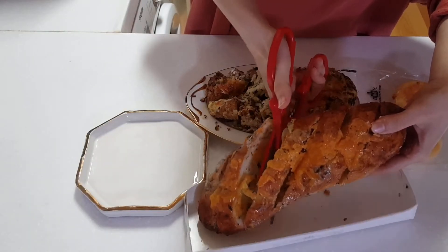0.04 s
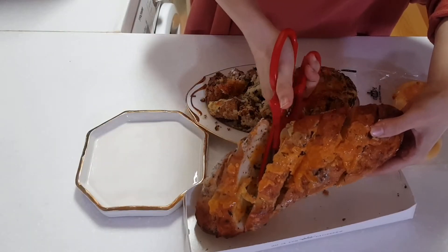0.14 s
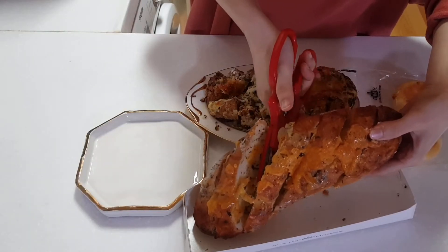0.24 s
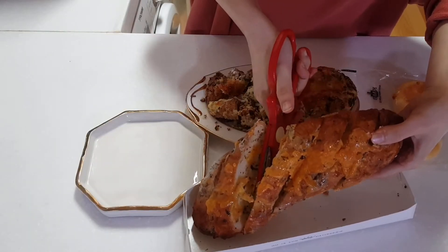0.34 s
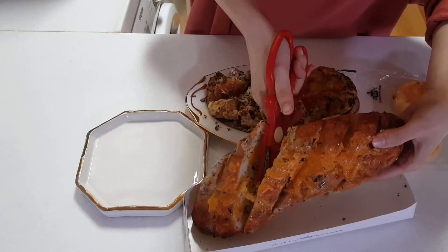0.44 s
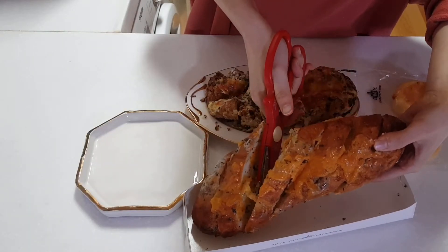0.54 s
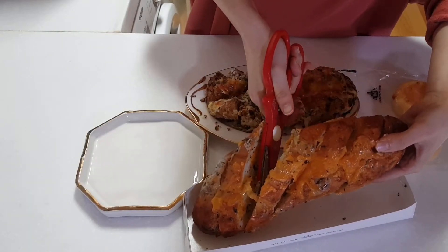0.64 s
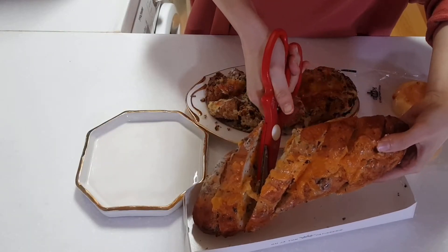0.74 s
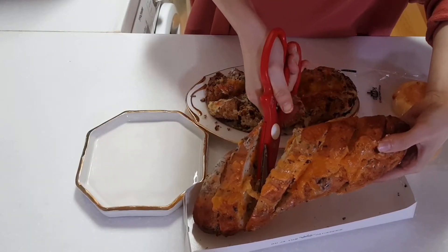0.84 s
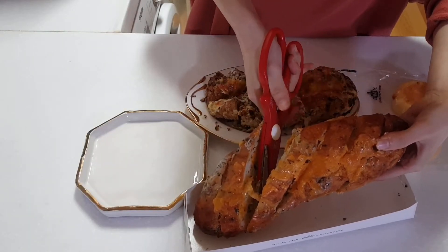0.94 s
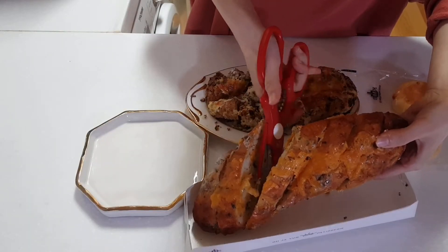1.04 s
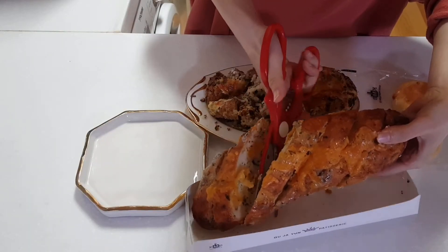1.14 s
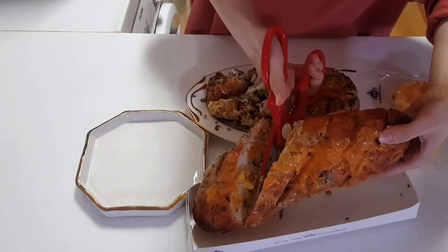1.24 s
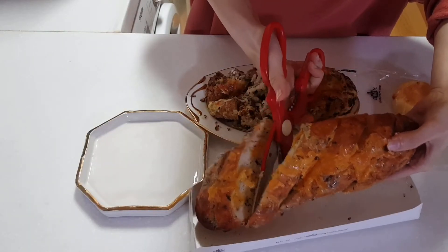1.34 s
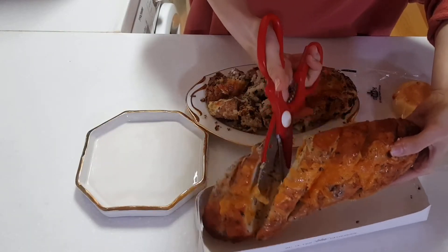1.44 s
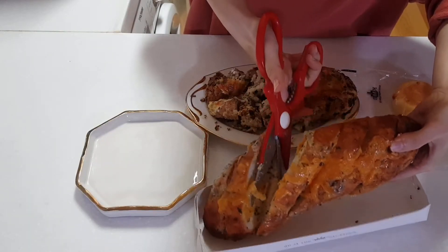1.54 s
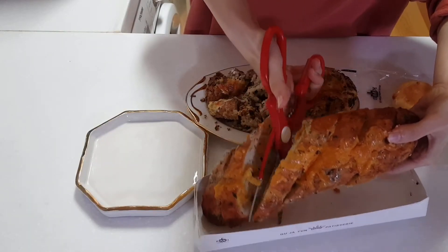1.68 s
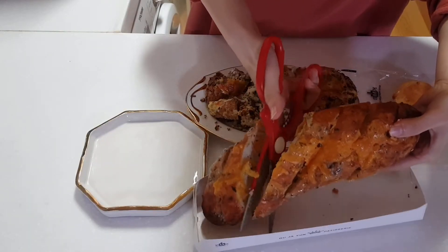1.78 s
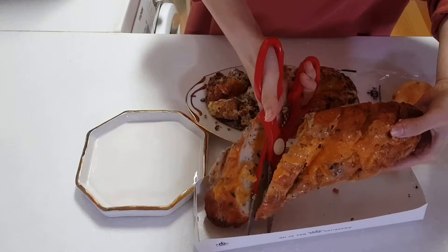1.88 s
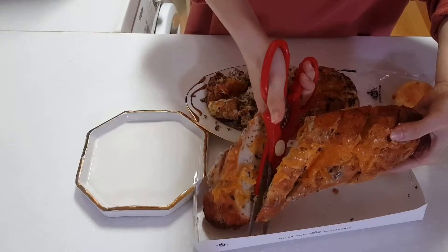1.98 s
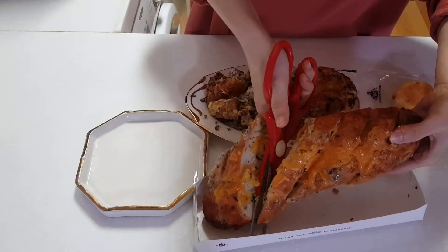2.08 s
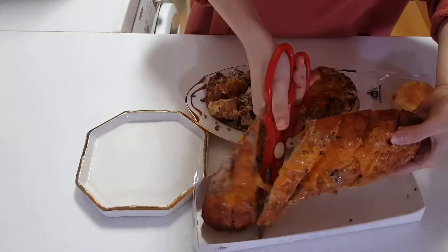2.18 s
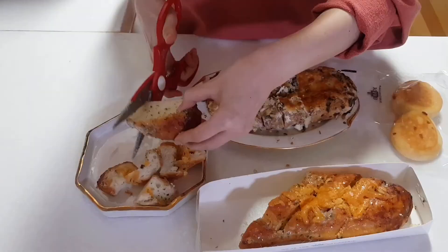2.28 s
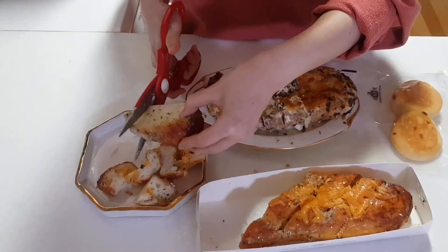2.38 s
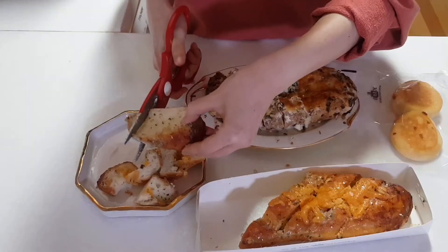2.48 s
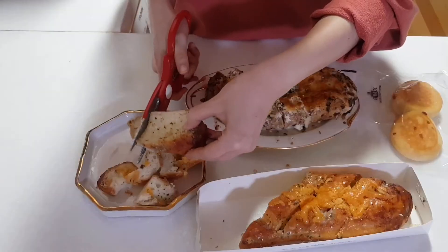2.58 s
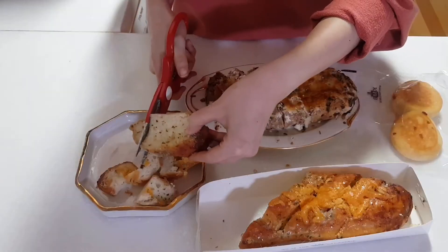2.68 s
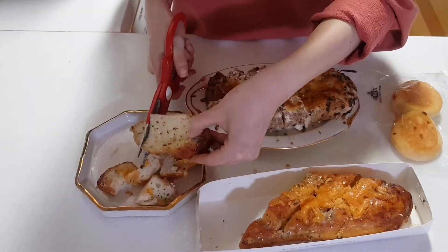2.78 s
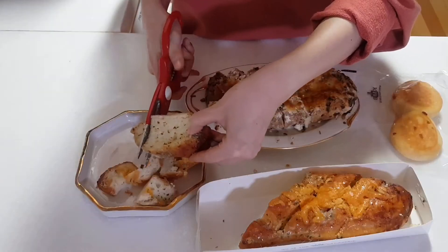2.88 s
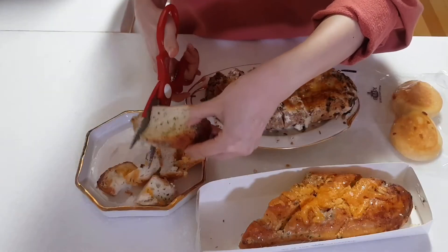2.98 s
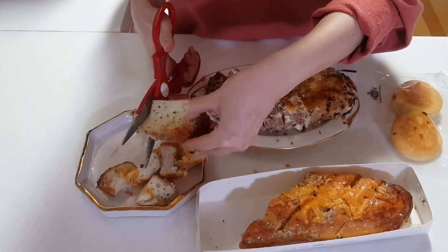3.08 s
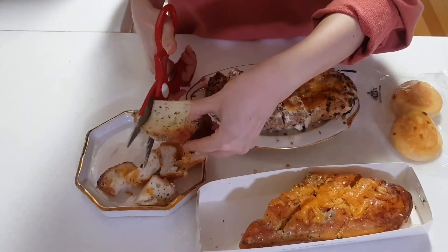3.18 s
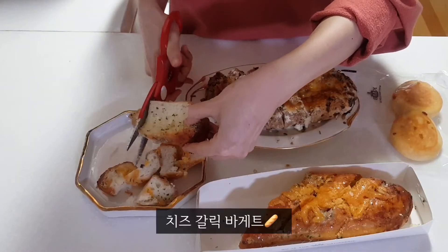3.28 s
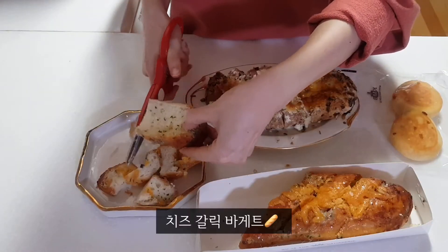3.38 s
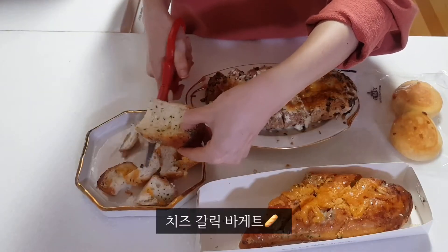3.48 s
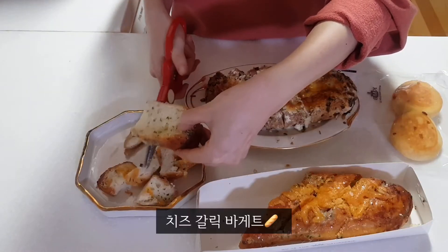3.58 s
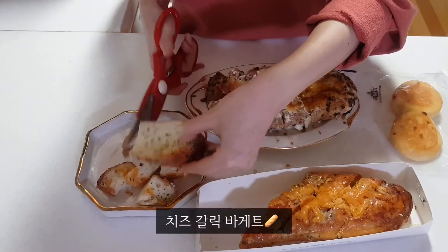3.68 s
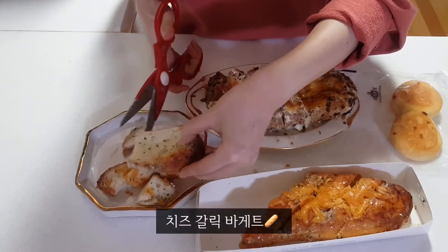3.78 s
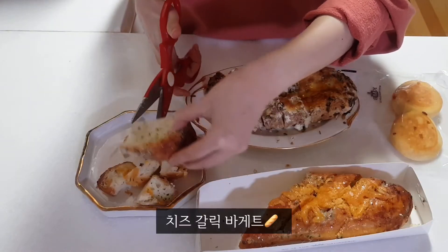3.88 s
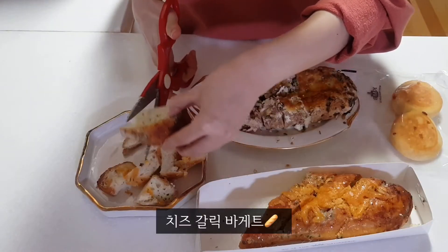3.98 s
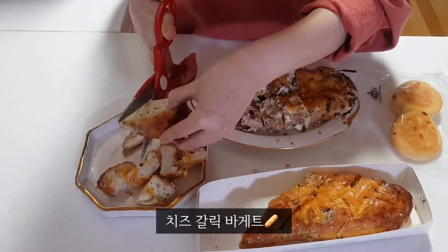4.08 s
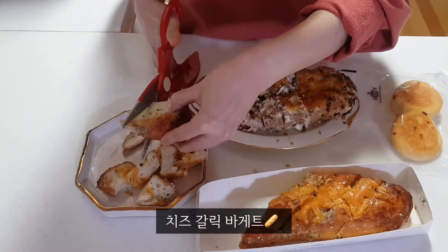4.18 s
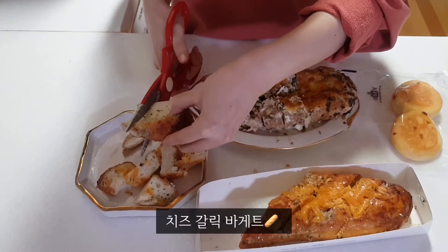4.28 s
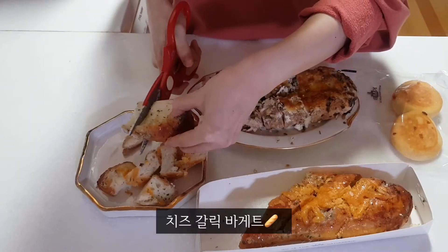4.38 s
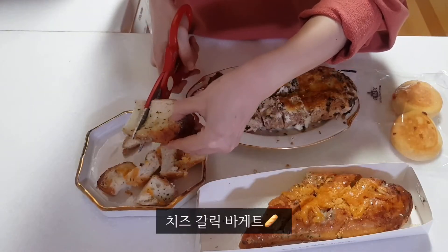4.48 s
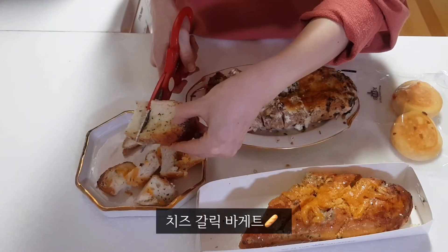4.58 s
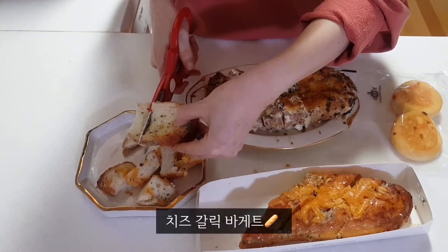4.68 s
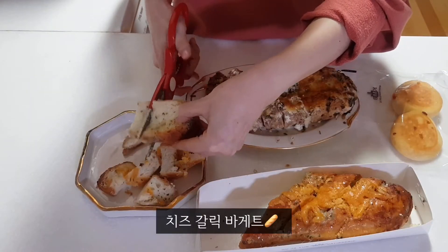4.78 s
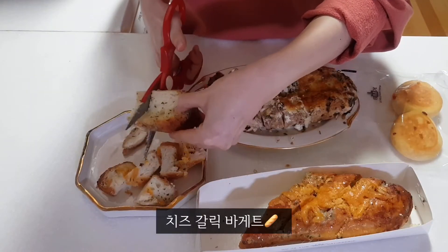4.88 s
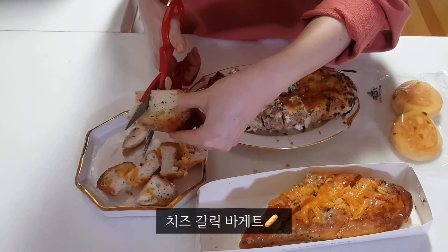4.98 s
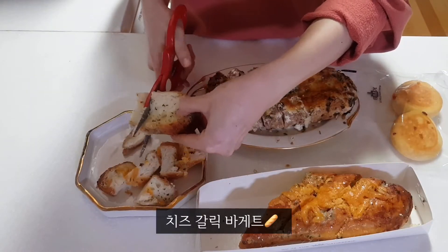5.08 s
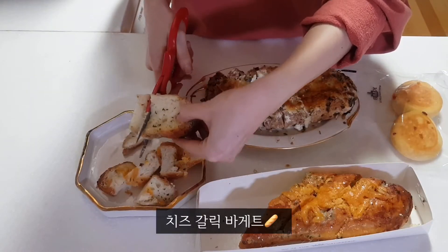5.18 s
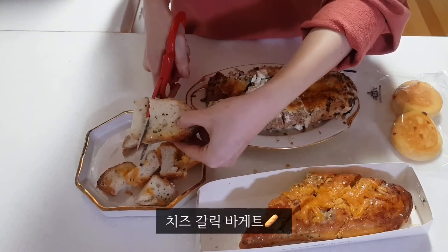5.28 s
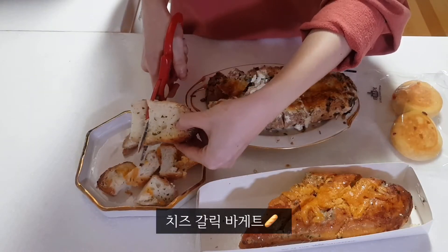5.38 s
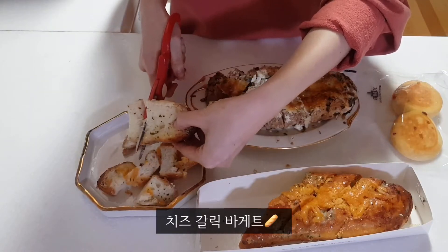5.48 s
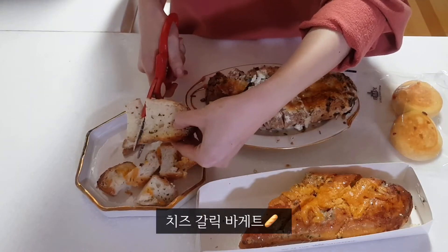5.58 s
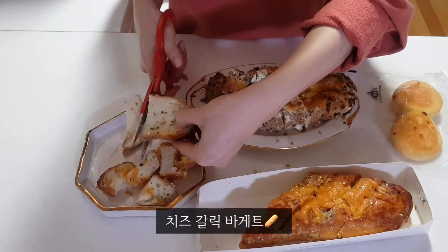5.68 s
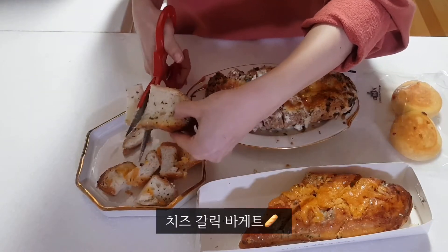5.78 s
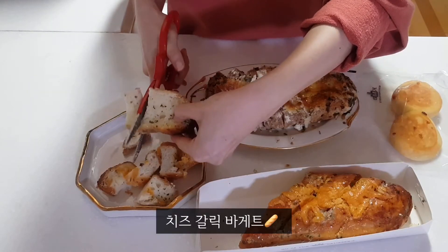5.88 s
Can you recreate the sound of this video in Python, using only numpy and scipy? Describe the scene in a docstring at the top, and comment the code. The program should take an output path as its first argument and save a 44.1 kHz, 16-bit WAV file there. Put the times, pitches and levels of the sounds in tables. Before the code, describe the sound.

A close stereo pickup at a table in a small, quiet room, with faint swelling mains hum and soft rumble and hiss throughout. From 0 to 0.7 s, scissors in a crusty loaf make fine crumbling and scattered sharp ticks. Around 1.1 s come a light tick, soft bread rubbing and small tray knocks, then very faint thin creaks until about 1.75 s. At 1.7-1.9 s the crust crunches and crackles with a knock. A brighter rasp from 2.0 s leads to the loudest event at 2.2 s: blades slam shut with a fast metallic chatter, brief ring and hollow cardboard thump. The tail is cut off at 2.33 s. Quieter plate work follows: a soft rub at 2.8 s, a crisp snip at 3.4 s, rustling and dropping knocks around 3.7 s, dull china bumps at 4.2 s, a small scraping cut at 4.4-4.6 s, and paired sharp ticks near 5.1-5.2 s. Then mostly hum remains to 5.9 s.

```python
"""Kitchen scissors cut a crusty cheese baguette on a cardboard tray, heard close up in a small room.
Fracture grains make the rasp and crumbling, pulses the ticks, decaying modes the ring of blades, tray and plate.
The blades snap shut once; the sound breaks off, then a slice is snipped up over a plate, where pieces drop.
Soft bread rubs and knocks as filtered noise and resonances; sines make a faint hum over soft noise.
Table levels are relative: each source adds its own gain."""
import sys
import numpy as np
from scipy import signal
from scipy.fft import rfft, irfft
from scipy.io import wavfile
from scipy.ndimage import uniform_filter1d

SR = 44100
rng = np.random.default_rng(int(sys.argv[2]) if len(sys.argv) > 2 else 0)


def output_pcm(signal):
    """Save a mono or channel-first signal as 16-bit PCM at the path in sys.argv[1].

    Samples are clipped to [-1, 1] before scaling.
    """
    pcm = np.clip(np.atleast_2d(signal).T, -1, 1) * 32767
    wavfile.write(sys.argv[1], SR, np.round(pcm).astype(np.int16))


N = 261954
TIME = np.arange(N) / SR
BREAK_S = 2.334   # tray part before, plate part after
# rise as a share of stroke length
SLIDE_RISE, CRUNCH_RISE, RUB_RISE, SQUEAK_RISE = 0.18, 0.1, 0.29, 0.72
RELEASE_DB_PER_S = 601

# blades slide through bread and along each other: start_s, length_s, level_db, easing_db
SLIDES = [(.14, 0.4, -70.5, 2), (2.004, 0.02, -57, 4.5), (2.034, 0.078, -49, 12), (2.139, 0.025, -48.5, 3),
          (2.181, 0.0067, -40, -2.5), (2.385, 0.25, -59.5, 6), (2.6, 0.52, -72.5, 13.5),
          (3.393, 0.0087, -50, 0), (3.4, 0.02, -47, 16), (4.27, 0.29, -68.5, -5.5), (4.405, 0.093, -55, 15),
          (4.505, 0.019, -51, 17), (4.598, 0.02, -57.5, 5.5), (5.097, 0.031, -50, 12),
          (5.2, 0.059, -61.5, -3.5)]
# crust crumbles under the blades: start_s, length_s, level_db, easing_db
CRUNCHES = [(.014, 0.21, -69, 9), (.147, 0.13, -61, 5), (1.098, 0.05, -70, -4.5), (1.71, 0.13, -52.5, 18),
            (1.92, 0.042, -58, 10.5), (2.04, 0.053, -49.5, 6), (2.139, 0.017, -50.5, 8),
            (3.402, 0.01, -43, 4.5), (4.415, 0.12, -60, 13), (4.87, 0.049, -72, 5.5)]
# spectrum of the blade rasp: freq_hz, level_db
SLIDE_COLOUR = [(300, -22), (1000, -11.5), (1400, -4.5), (2200, -5.5), (3300, -10.5), (4500, -2), (6300, 0),
                (8500, -3), (12000, 2.5), (16000, -3)]
# spectrum of breaking crust, also used by crackles: freq_hz, level_db
CRUNCH_COLOUR = [(200, -15.5), (700, -5.5), (1150, -11.5), (1700, 0), (2400, 0), (3500, -6.5), (5500, -6.5),
                 (7400, -4.5), (8800, -18), (16000, -20)]


def cutting():
    """Fine bright rasp of the blades and coarser crumbling of the crust, both made of tiny fractures."""
    rasp = grains(SLIDE_COLOUR, per_s=3200, spread_db=3.5, clump_db=10.0, clumps_per_s=220)
    crust = grains(CRUNCH_COLOUR, per_s=600, spread_db=7.5, clump_db=16.0, clumps_per_s=140)
    rasp = effort(SLIDES, SLIDE_RISE) * rasp
    crust = effort(CRUNCHES, CRUNCH_RISE) * crust
    return from_db(3.0) * rasp + from_db(-1.0) * crust


# blades slam shut, with rebounds, then the crust cracks once: start_s, strength_db
SNAP = [(2.1955, 3.5), (2.2012, -8), (2.2025, -4.5), (2.2090, -5.5), (2.2155, -16.5)]
# spectrum of the steel crack: freq_hz, level_db
SNAP_COLOUR = [(250, -27), (900, -16), (1450, -22), (1950, -9.5), (2450, -6.5), (2850, -15), (3400, -12),
               (4100, -3), (5100, -12), (6200, -3), (7500, 4.5), (8600, -15.5), (9600, -3.5), (12000, -5.5),
               (13700, -10), (16000, -18)]
# steel blades pressed shut: freq_hz, level_db, t60_s
BLADE_MODES = [(1945, -6, .14), (2553, -3, .18), (5900, -3.5, 0.19), (6700, -3, .2), (7104, 0, .22),
               (7404, 2, .22), (7504, -2, 0.36), (10386, -3, .17), (10539, -3, .16), (11958, -4, .17)]


def snap(chatter_t60_s=.007, chatter=1.6, uneven_db=1.5):
    """Steel hits steel, then the crust cracks once: each impact is a crack with brief chatter and its own
    colour; the blades ring."""
    out, t = np.zeros(N), TIME[:2048]
    for start_s, strength_db in SNAP:
        noise = rng.standard_normal(len(t))
        force = chatter * unit_energy(noise * from_db(-60 * t / chatter_t60_s))
        force[0] += 1
        colour = [(hz, db + uneven_db * rng.uniform(-1, 1)) for hz, db in SNAP_COLOUR]
        crack = unit_energy(convolve(force, pulse(colour)))
        add(out, start_s, from_db(strength_db + 4.0) * crack)
    return out + from_db(-3.5) * ringing(BLADE_MODES, SNAP)


# blade edges and breaking crust: start_s, peak_db, body_db
TICKS = [(.019,-40,0),(.167,-36.5,-11),(.192,-40,-10),(.2344,-42,-3),(.311,-40,-12.5),(.4895,-33.5,-24.5),(.507,-32,-16.5),(.5633,-31,-21.5),(.7177,-34,-19),(1.1025,-44.5,-4),(1.743,-28.5,-7),(1.8962,-39,-11),(1.9215,-33.5,-14),(2.0395,-31.5,-17),(2.141,-30.5,-14.5),(2.186,-27,-14),(3.343,-45,-9.5),(3.413,-36,-9),(4.518,-40,-11),(5.099,-28.5,-12.5),(5.106,-29,-13.5),(5.213,-36,-12)]
# treble level; treble dB per dB of body: thick crust cracks duller
TICK_TOP_DB, TOP_PER_BODY = -21, -0.56


def ticks(rows):
    """Each tick is one sharp pulse with more or less body."""
    out = np.zeros(N)
    for start_s, peak_db, body_db in rows:
        top_db = TICK_TOP_DB + TOP_PER_BODY * body_db
        colour = [(300, body_db - 13.5), (1000, body_db - 3.0), (2000, body_db + 1.0),
                  (3400, body_db - 6.0), (6000, -14.5), (11000, top_db), (16000, top_db - 2.0)]
        add(out, start_s, from_db(peak_db + 5.5) * unit_energy(pulse(colour)))
    return out


# crust cracks, later stick-slip scrapes of the blades: start_s, peak_db, ring_hz
CRACKLES = [(1.7225, -40, 2630), (1.7505, -40, 2520), (1.7635, -46, 2050), (1.785, -49, 2500),
            (1.801, -45.5, 1400), (4.423, -55, 1390), (4.431, -49, 1780), (4.488, -52, 1400),
            (4.516, -52.5, 1350), (4.553, -57, 1392), (4.604, -55.5, 1730)]


def crackles(ring_cycles=28, crack=0.36, crack_t60_s=0.008):
    """Each crust crack or stick-slip scrape is a tiny noise burst with a brief ring at its own pitch."""
    out, t = np.zeros(N), TIME[:2048]
    for start_s, peak_db, ring_hz in CRACKLES:
        tone = np.sin(2 * np.pi * ring_hz * t) * from_db(-60 * t * ring_hz / ring_cycles)
        burst = rng.standard_normal(len(t)) * from_db(-60 * t / crack_t60_s)
        burst = convolve(burst, unit_energy(pulse(CRUNCH_COLOUR)))
        add(out, start_s, from_db(peak_db) * (tone + crack * burst))
    return out


# scissors creak as they are worked open: start_s, length_s, level_db, first_hz, last_hz
SQUEAKS = [(.22, 0.19, -80.5, 2300, 2290), (1.01, .016, -83, 1900, 1450), (1.29, 0.23, -80.5, 2520, 2470),
           (1.48, .05, -83.5, 720, 930), (1.572, 0.19, -79, 2460, 2570)]


def squeak(width_hz=170, rough_db=3.0, wander=0.005, easing_db=4):
    """Uneven stick and slip in one narrow resonance that glides and wavers with the pressure."""
    slips = rng.standard_normal(N) * from_db(rough_db * drift(70))
    waver, out = 1 + wander * drift(13), 0
    for start_s, length_s, level_db, first_hz, last_hz in SQUEAKS:
        hz = np.interp(TIME, [start_s, start_s + length_s], [first_hz, last_hz]) * waver
        whistle = moving_resonance(slips, hz, width_hz)
        whistle = moving_resonance(whistle, hz, 2 * width_hz)
        out = out + stroke(start_s, length_s, level_db, easing_db, SQUEAK_RISE) * whistle
    return from_db(5.5) * out


# open blades touch: start_s, strength_db
BLADE_TOUCHES = [(5.018, -21)]
# steel blades standing open: freq_hz, level_db, t60_s
OPEN_BLADE_MODES = [(1400, -7, .05), (2000, -5, 0.033), (5270, -12, .08), (7569, -1.5, 0.061),
                    (10900, -6, .07)]


def open_blades(touches):
    """The open blades touch and their modes ring faintly."""
    return ringing(OPEN_BLADE_MODES, touches)


# bread shifts on tray and plate: start_s, length_s, level_db, easing_db, hollow_hz
RUBS = [(0, 0.077, -64, 3, 550), (0.091, 0.11, -61, 25, 690), (1.066, 0.16, -63, 16, 457),
        (1.714, 0.16, -53, 18.5, 744), (2.368, 0.2, -61.5, 11.5, 1350), (2.526, 0.23, -66.5, 4.5, 631),
        (2.767, 0.1, -52.5, 13, 600), (2.997, 0.11, -70, -0.5, 582), (3.374, 0.3, -59.5, 6, 534),
        (3.667, 0.052, -56, 0, 518), (3.695, 0.14, -42, 21.5, 515), (3.7, 0.22, -47.5, 23, 1060),
        (4.025, 0.12, -64, 2, 558), (4.201, 0.1, -59, 5.5, 383), (5.146, 0.11, -60, 5.5, 497)]
# spectrum of the dull rustle: freq_hz, level_db
RUB_COLOUR = [(60, -14.5), (170, -9.5), (330, -9), (500, 0), (650, -12.5), (870, -2), (1400, -12),
              (1900, -18.5), (3500, -22), (7500, -23), (8800, -29), (16000, -37.5)]
# a firm rub rustles more, a light one is mostly hollow tone
FIRM_RUB_DB, RUSTLE_GROWTH = -46.5, 0.14


def rubbing(width_hz=200, width_at_hz=550, width_growth=1.9, wander=0.041, rough_db=2.0):
    """Soft bread slips in small steps: dull rustle and wandering hollow resonance, broader when higher."""
    rustle = grains(RUB_COLOUR, per_s=3000, spread_db=3.5, clump_db=2.5, clumps_per_s=70)
    slips = rng.standard_normal(N) * from_db(rough_db * drift(150))
    waver, hollow = 1 + wander * drift(22), 0
    for *shape, hollow_hz in RUBS:
        centre_hz = hollow_hz * waver
        band_hz = width_hz * (hollow_hz / width_at_hz) ** width_growth
        tone = moving_resonance(slips, centre_hz, band_hz)
        tone = moving_resonance(tone, centre_hz, band_hz)
        hollow = hollow + stroke(*shape, RUB_RISE) * tone
    band = signal.butter(4, [280, 1950], "band", fs=SR, output="sos")
    hollow = signal.sosfilt(band, hollow)
    force = effort(RUBS, RUB_RISE)
    rustle = force * (force / from_db(FIRM_RUB_DB)) ** RUSTLE_GROWTH * rustle
    return from_db(-4.0) * rustle + from_db(-3.5) * hollow


# bread and scissors on tray and plate: start_s, level_db, ring_hz, bass_db, hardness_db
KNOCKS = [(1.076,-51.5,378,6.5,-10),(1.101,-54.5,573,14,12),(1.137,-41.5,291,1,7.5),(1.198,-54,487,-3,3),(1.713,-41,550,-2,-3),(1.722,-32.5,2000,-2.5,7.5),(1.926,-46,390,-7.5,-12),(2.2138,-29.5,316,5,-19),(2.236,-33,580,-5,-6),(2.776,-56,552,8,-15.5),(2.789,-54.5,595,7,-17),(3.4686,-37,1176,3.5,-1.5),(3.471,-55,138,22,-16),(3.671,-50,521,7,-8),(3.711,-36,497,-3,-22),(3.724,-32.5,1182,-6,-5.5),(3.748,-31.5,880,-11,-11),(4.193,-49.5,376,14,1),(4.24,-49.5,360,13,-7),(5.16,-57.5,133.5,11,2)]
RING_PER_BASS = 0.46   # dB of ring per dB of bass: a heavy knock rings more
RATTLE_PER_HARDNESS = -0.25   # dB of rattle length per dB of hardness: a soft piece lands slowly


def knocks(rows, rattle_t60_s=0.046, rattle=1.0, ring_cycles=30, ring=0.65, contact_s=0.00039):
    """A push with a short rattle of crumbs, and one damped tray or plate resonance; harder is brighter."""
    out, t = np.zeros(N), TIME[:4096]
    for start_s, level_db, ring_hz, bass_db, hard_db in rows:
        t60_s = rattle_t60_s * from_db(RATTLE_PER_HARDNESS * hard_db)
        crumbs = unit_energy(rng.standard_normal(len(t)) * from_db(-60 * t / t60_s))
        push = t * np.exp(-t / contact_s)   # a soft contact swells instead of clicking
        force = rattle * crumbs + 0.16 * unit_energy(np.gradient(push))
        colour = [(50, bass_db - 15.5), (130, bass_db - 10), (220, bass_db - 2.0),
                  (340, bass_db + 3), (950, 0.77), (2700, hard_db - 7.0), (3900, hard_db - 16.0),
                  (7400, hard_db - 28.5), (9500, hard_db - 30.0)]
        thud = unit_energy(convolve(force, pulse(colour)))
        decay = from_db(-60 * t * ring_hz / ring_cycles)
        tone = unit_energy(np.sin(2 * np.pi * ring_hz * t) * decay)
        tone = ring * from_db(RING_PER_BASS * bass_db) * tone
        add(out, start_s, from_db(level_db + 17.0) * (thud + tone))
    return out


# bumps hard enough to ring the plate: start_s, strength_db
PLATE_TOUCHES = [(4.193, -24.5), (4.241, -20)]
# china plate damped by the bread: freq_hz, level_db, t60_s
PLATE_MODES = [(1078, 0.5, .08), (1480, -2, 0.07), (2095, -9, 0.06), (2740, -1.5, 0.03)]


def plate():
    """Bumps ring the modes of the damped china plate."""
    return ringing(PLATE_MODES, PLATE_TOUCHES)


# the snap jolts the loaf against the tray: start_s, strength_db
TRAY_BUMPS = [(2.214, 0)]
# hollow cardboard tray on the table: freq_hz, level_db, t60_s
TRAY_MODES = [(318.4, -0.5, .06), (554.7, -1, 0.13)]


def tray():
    """The jolt rings the modes of the hollow cardboard tray."""
    return ringing(TRAY_MODES, TRAY_BUMPS)


# reverberation: freq_hz, t60_s
ROOM_T60 = [(150, 0.43), (400, 0.26), (1000, 0.28), (2800, 0.29), (7300, 0.33), (15000, 0.25)]
# left-right correlation of the room: freq_hz, likeness
ROOM_LIKENESS = [(100, 0.54), (300, 0.74), (700, 0.31), (2000, 0.062), (8000, 0.045)]


def room(dry, late_db=-5.0, early_db=-6, early_t60_s=0.043, gap_s=0.0046):
    """Quick table-top reflections and a short diffuse tail, as decaying noise responses in stereo."""
    size = 24000
    t, hz = TIME[:size], np.fft.rfftfreq(size, 1 / SR)
    noise = stereo_noise(ROOM_LIKENESS, size)
    edges_hz = [0, *(125 * 2 ** np.arange(8)), SR]
    late = 0
    for low, high in zip(edges_hz, edges_hz[1:]):
        band = irfft(noise * ((hz >= low) & (hz < high)))
        late = late + band * from_db(-60 * t / at_hz(ROOM_T60, low * np.sqrt(2)))
    late = unit_energy(late * (1 - np.exp(-t / gap_s)))
    early = irfft(stereo_noise(ROOM_LIKENESS, size)) * from_db(-60 * t / early_t60_s)
    early = unit_energy(early * (t > .0007))
    response = np.sqrt(2) * (from_db(late_db) * late + from_db(early_db) * early)
    return np.array([convolve(dry, side) for side in response])


def heard(dry, pan_db, lag_count):
    """Direct sound and room; the right channel is pan_db quieter and lag_count samples later."""
    left, right = from_db(-3.0) * dry + room(dry)
    return from_db(4.0) * np.array([left, from_db(-pan_db) * np.roll(right, lag_count)])


# mains hum partials: multiple, level_db
HUM = [(1, -1.5), (3, -17.5), (5, -14), (6, -20), (7, -14), (8, -17), (9, -18.5)]
# swell of the fundamental: time_s, level_db
HUM_SWELL = [(0, -74.5), (.4, -71.5), (1.15, -65), (1.55, -70), (2.3, -70.5), (3.05, -62), (3.75, -68.5),
             (4.5, -70.5), (4.9, -76.5), (5.94, -69.5)]
HUM_HZ, HUM_DB = 59.46, -69   # HUM_DB: base level of the overtones


def hum():
    """Mains sines: a swelling fundamental and unsteady overtones, stronger on the left."""
    out = 0
    for multiple, level_db in HUM:
        level = gain_curve(HUM_SWELL) if multiple == 1 else from_db(HUM_DB + 2.0 * drift(3.5))
        tone = np.sin(2 * np.pi * (multiple * HUM_HZ * TIME + rng.random()))
        out = out + from_db(level_db) * level * np.sqrt(2) * tone
    return out * from_db([[3.4], [-5.7]])


# noise spectrum: freq_hz, level_db
FLOOR_COLOUR = [(20, -3), (45, -0.5), (100, 1), (210, -11), (400, -6.5), (560, -8), (700, -12),
                (2000, -17.5), (4500, -24.5), (7500, -23), (9000, -28.5), (12000, -19.5), (16000, -20)]
# left-right correlation: freq_hz, likeness
FLOOR_LIKENESS = [(60, 0.87), (400, 0.59), (1500, 0.096), (5000, 0.21)]
# left minus right: freq_hz, balance_db
FLOOR_BALANCE = [(60, 4), (500, 8.5), (1500, 2.5), (5000, 5), (14000, 2)]
FLOOR_DB = -73


def room_air():
    """Soft room rumble and hiss: stereo noise shaped in frequency."""
    hz = np.fft.rfftfreq(N, 1 / SR)
    balance = from_db(at_hz(FLOOR_BALANCE, hz) * np.array([[.5], [-.5]]))
    balance = balance / balance.mean(0)
    spectrum = stereo_noise(FLOOR_LIKENESS, N) * from_db(at_hz(FLOOR_COLOUR, hz))
    air = irfft(spectrum * balance, N)
    return from_db(FLOOR_DB) * air / np.std(air.mean(0))


def from_db(db):
    """Decibels to gain."""
    return 10 ** (np.asarray(db) / 20)


def rms_one(x):
    """Scale to rms 1."""
    return x / np.sqrt(np.mean(x ** 2) + 1e-20)


def unit_energy(x):
    """Scale to total energy 1."""
    return x / np.sqrt(np.sum(x ** 2) + 1e-20)


def gain_curve(rows):
    """Rows of time_s, level_db as a gain for every sample."""
    return from_db(np.interp(TIME, *np.transpose(rows)))


def at_hz(points, hz):
    """Read a table on a log-frequency axis."""
    table = np.array(points)
    return np.interp(np.log(np.maximum(hz, 1)), np.log(table[:, 0]), table[:, 1])


def drift(rate_hz):
    """Random wander: straight lines between normal draws, rate_hz draws a second."""
    steps = rng.standard_normal(8000)
    return np.interp(TIME * rate_hz, np.arange(len(steps)), steps)


def pulse(colour, size=2048):
    """Minimum-phase pulse of the given spectrum, by folding the cepstrum."""
    cepstrum = irfft(np.log(from_db(at_hz(colour, np.fft.rfftfreq(size, 1 / SR)))))
    cepstrum[1:size // 2] *= 2
    cepstrum[size // 2 + 1:] = 0
    return irfft(np.exp(rfft(cepstrum)))


def convolve(x, response):
    """Pass a signal through a response, keeping its length."""
    return signal.oaconvolve(x, response)[:len(x)]


def add(track, start_s, sound):
    """Mix a sound into a track at start_s."""
    start = max(int(round(start_s * SR)), 0)
    track[start:start + len(sound)] += sound[:N - start]


def stereo_noise(likeness, size):
    """Spectra of two white noises, correlated by the given table."""
    alike = np.clip(at_hz(likeness, np.fft.rfftfreq(size, 1 / SR)), -.99, .99)
    mid, side = np.exp(2j * np.pi * rng.random((2, size // 2 + 1)))
    return np.sqrt(1 + alike) * mid + np.sqrt(1 - alike) * side * [[1], [-1]]


def grains(colour, per_s, spread_db, clump_db, clumps_per_s):
    """Tiny fractures of uneven size that come in clumps; rms 1."""
    born = rng.random(N) < per_s / SR
    sizes = from_db(spread_db * np.minimum(rng.exponential(1, N), 4)) * rng.choice([-1, 1], N)
    clicks = born * sizes * from_db(clump_db * drift(clumps_per_s))
    # the steady push of the hand keeps the average work even
    power = np.abs(uniform_filter1d(clicks ** 2, size=700))
    clicks = clicks / np.sqrt(power + 1e-6)
    return rms_one(convolve(clicks, pulse(colour)))


def moving_resonance(x, hz, width_hz):
    """One damped resonance whose centre follows hz; rms 1."""
    turn = np.exp(2j * np.pi * np.cumsum(hz) / SR)
    damped = signal.lfilter([1], [1, -np.exp(-np.pi * width_hz / SR)], x / turn)
    return rms_one((turn * damped).real)


def stroke(start_s, length_s, level_db, easing_db, rise):
    """Gain of one hand stroke: builds up, eases off by easing_db over its length, then lets go."""
    t = np.maximum(TIME - start_s, 0)
    length_s = max(length_s, .002)
    rise_s = np.clip(rise, .01, .9) * length_s
    eased = np.clip((t - rise_s) / (length_s - rise_s), 0, 1)
    released_s = np.clip(t - length_s, 0, 1)
    gain = from_db(level_db - easing_db * eased - RELEASE_DB_PER_S * released_s)
    return np.minimum(t / rise_s, 1) * gain


def effort(rows, rise):
    """Gain of a whole table of strokes; where they overlap their powers add."""
    return np.sqrt(sum(stroke(*row[:4], rise) ** 2 for row in rows))


def ringing(body, blows):
    """Every blow sets the modes of a body ringing, each mode with a random strength."""
    out, t = np.zeros(N), TIME[:SR // 2]
    hz, level_db, t60_s = np.transpose(body)[:, :, None]
    modes = from_db(level_db - 60 * t / t60_s) * np.sin(2 * np.pi * hz * t)
    for start_s, strength_db in blows:
        uneven = from_db(rng.normal(0, 2, len(hz)))
        add(out, start_s, from_db(strength_db - 38) * (uneven @ modes))
    return out


# right-channel treble of the snap: freq_hz, level_db
RIGHT_SNAP_COLOUR = [(4300, 0.5), (6300, -3), (7800, -10.5), (8650, 8.5), (9700, 1.5), (13000, 0)]


def scene():
    """Cutting on the tray stops dead in the tail of the snap; the slice over the plate follows."""
    blades = cutting() + squeak() + crackles()
    bread = rubbing() + plate() + tray()
    first = np.clip((BREAK_S - TIME) / .004 + .5, 0, 1)   # 4 ms crossfade
    left, right = heard(snap(), pan_db=7.5, lag_count=1)
    right = convolve(right, pulse(RIGHT_SNAP_COLOUR))
    out = room_air() + hum() + first * np.array([left, right])
    for on_tray, part in ((True, first), (False, 1 - first)):
        tick_rows, knock_rows, touch_rows = (
            [row for row in table if (row[0] < BREAK_S) == on_tray]
            for table in (TICKS, KNOCKS, BLADE_TOUCHES))
        scissors = part * blades + ticks(tick_rows) + open_blades(touch_rows)
        scissors = heard(scissors, pan_db=12.5, lag_count=1 if on_tray else 6)
        table_top = part * bread + knocks(knock_rows)
        table_top = heard(table_top, pan_db=7.5 if on_tray else 9.0, lag_count=1)
        out = out + part * (scissors + table_top)
    return out


CUTOFF_HZ = 15900


def record(dry):
    """Clip at full scale, then cut the top with a steep low-pass."""
    low_pass = signal.ellip(10, .1, 70, CUTOFF_HZ, fs=SR, output="sos")
    return signal.sosfilt(low_pass, np.clip(dry, -1, 1))


dry = scene()
out = record(dry)
output_pcm(out)
```